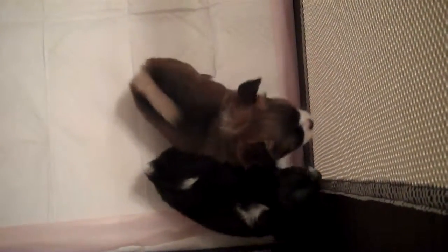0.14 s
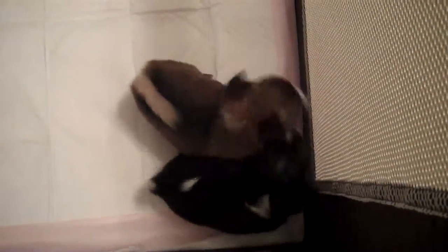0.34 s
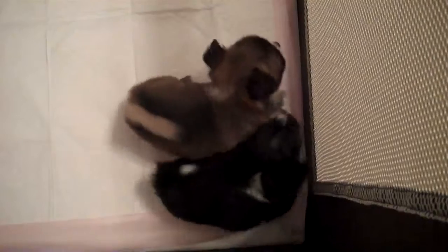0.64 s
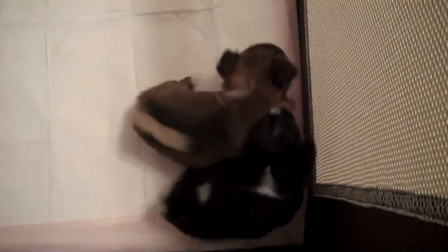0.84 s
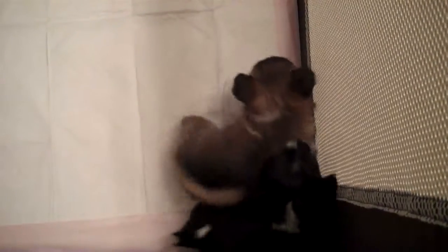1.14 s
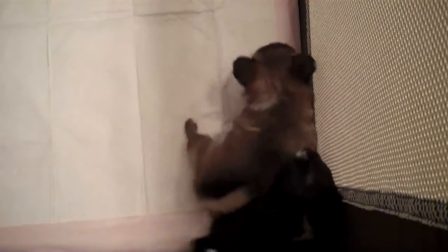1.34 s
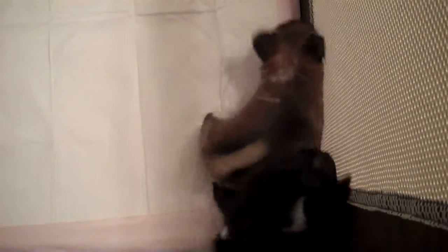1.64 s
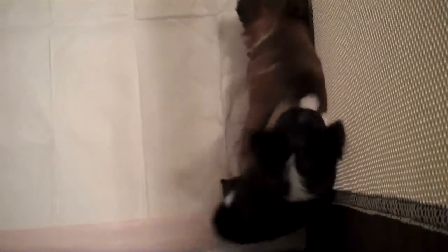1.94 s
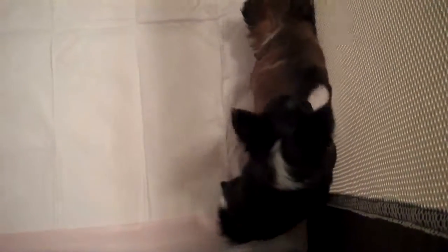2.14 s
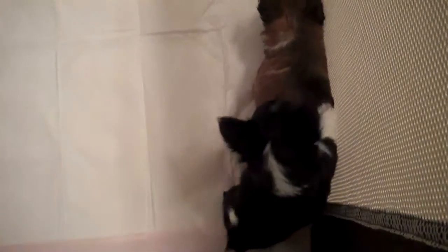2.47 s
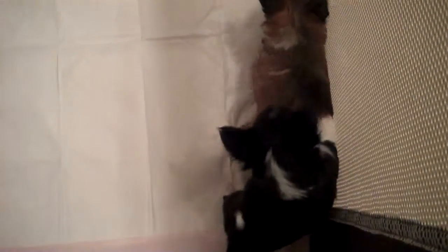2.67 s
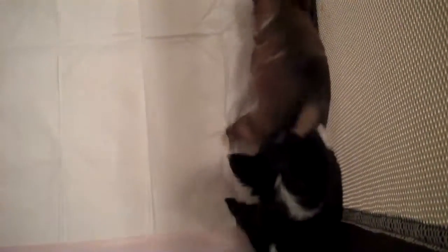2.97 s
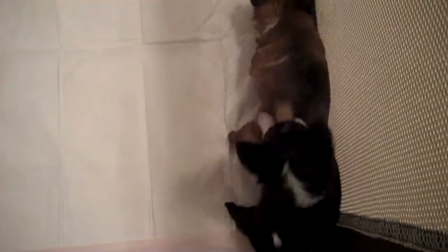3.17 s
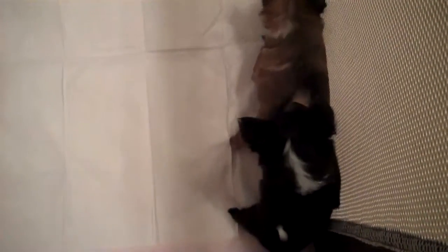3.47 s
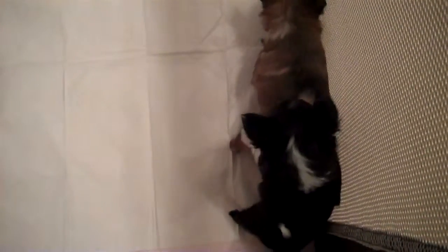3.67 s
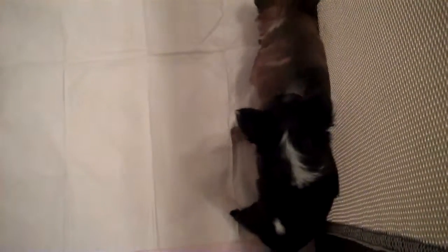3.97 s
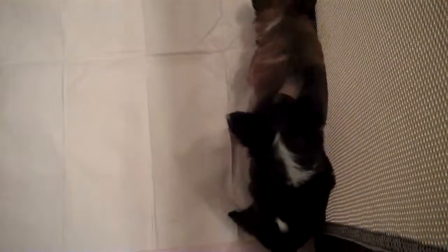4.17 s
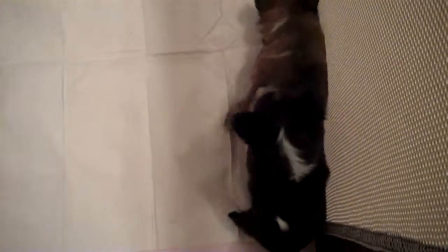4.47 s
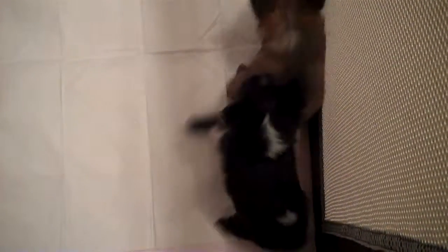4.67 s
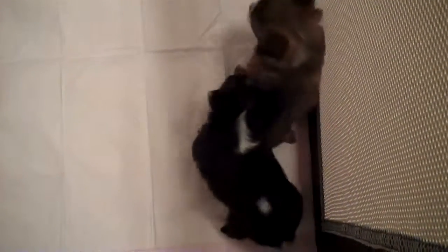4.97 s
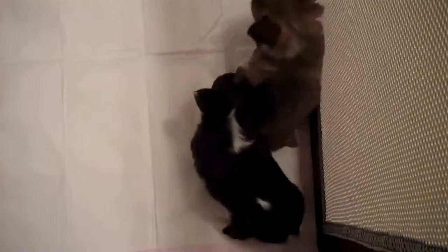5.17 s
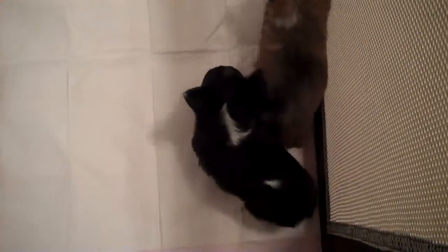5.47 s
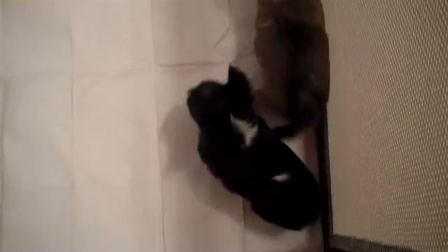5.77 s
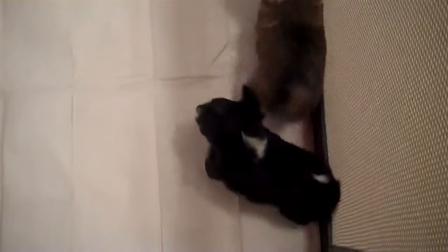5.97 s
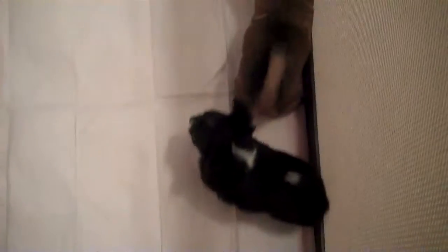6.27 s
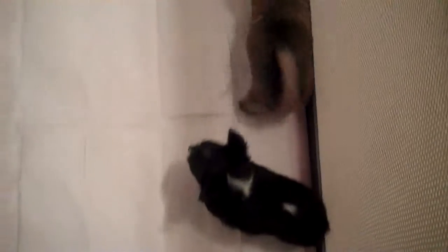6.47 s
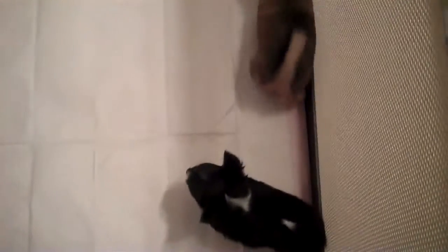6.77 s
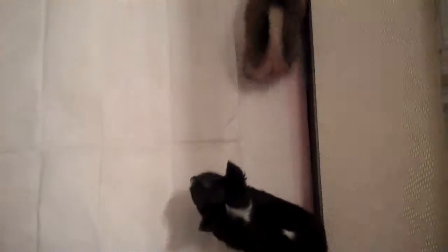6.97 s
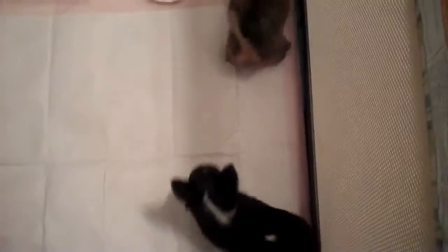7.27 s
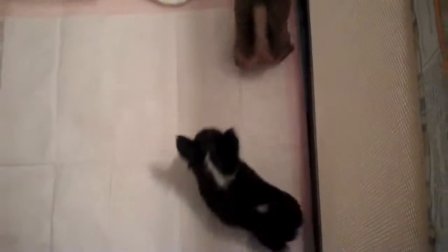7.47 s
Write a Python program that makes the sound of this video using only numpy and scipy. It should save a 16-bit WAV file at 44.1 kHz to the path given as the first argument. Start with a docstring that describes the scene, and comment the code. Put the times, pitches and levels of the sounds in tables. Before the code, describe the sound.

Scratchy paw scuffs, claw ticks and dull tray knocks as wrestling puppies yip hoarsely, then whine in thin, airy, arching squeaks.

```python
"""Two puppies wrestling in a pen

Paws scuff a thin pad as grains of noise, claws tick as filtered snaps, and paws knock a tray that rings.
The puppies give short rough yips, vocal-fold pulses and breath through throat and mouth resonances,
and a row of breathy squeaks, two gliding bands of noise over a wide hiss. Air noise and a low hum
surround them; a small two-port microphone with a treble resonance listens from above."""
import sys
import numpy as np
from scipy import signal
from scipy.fft import rfft, irfft, next_fast_len
from scipy.io import wavfile
from scipy.ndimage import map_coordinates

SR = 44100
rng = np.random.default_rng(int(sys.argv[2]) if len(sys.argv) > 2 else 0)


def pcm_store(signal):
    """Save signal as 16-bit PCM."""
    levels = np.round(np.clip(np.atleast_2d(signal), -1, 1) * 32767)
    wavfile.write(sys.argv[1], SR, levels.astype(np.int16).T)


N = 336042


def amp(db):
    """Decibel law: level to amplitude ratio."""
    return 10 ** (np.asarray(db) / 20)


def unit(x):
    """Normalisation to an rms of 1."""
    return x / np.sqrt(np.mean(x ** 2) + 1e-20)


def along(points, hz):
    """Interpolation of (frequency, value) points on a logarithmic frequency axis."""
    f, v = np.transpose(points)
    return np.interp(np.log(hz + 1), np.log(f + 1), v)


def wobble(rate):
    """Band-limited randomness: a smooth curve through rate random knots a second."""
    knots = rng.standard_normal(int(N * rate / SR) + 4)
    return map_coordinates(knots, [np.arange(N) * rate / SR])


def filtered(x, response):
    """Linear filtering: the spectrum of x times a complex response of frequency."""
    m = next_fast_len(x.shape[-1] + 4096)
    spectrum = rfft(x, m) * response(np.fft.rfftfreq(m, 1 / SR))
    return irfft(spectrum, m)[..., :x.shape[-1]]


def mode(f, hz, width_hz):
    """Damped resonance: a causal second-order response of gain 1 at its peak."""
    return 1j * f * width_hz / (hz * hz - f * f + 1j * f * width_hz)


def swell(t, rise, fall, attack, shape):
    """Growth and decay: gain 1 at t = 0, 6 dB down at -rise and fall; larger powers steepen the edges."""
    return .5 ** np.where(t < 0, np.abs(t / rise) ** attack, np.abs(t / fall) ** shape)


def sides(pan_db):
    """Level panning: left and right gains for a left-minus-right level."""
    return amp(np.array([[.5], [-.5]]) * pan_db)


def rush(pair, spectrum, alike):
    """Partial coherence: two unrelated signals coloured and mixed to a stereo pair of rms 1."""
    def mix(hz):
        turn = np.arccos(np.clip(along(alike, hz), -1, 1)) / 2
        return amp(along(spectrum, hz)) * [np.cos(turn), np.sin(turn)]

    mid, side = filtered(pair, mix)
    return unit(np.array([mid + side, mid - side]))


# spectrum of room and circuit noise: (frequency [Hz], relative density [dB])
AIR_SPECTRUM = [(20, -9), (60, -6), (150, -6), (300, -1.5), (600, -3), (1000, -4), (1600, -7.5),
                (3000, -10.5), (5500, -13.5), (9000, -15.5), (14500, -15)]
# likeness of left and right in that noise: (frequency [Hz], correlation [0-1])
AIR_LIKENESS = [(20, .05), (40, .1), (70, 0.29), (130, 0.45), (500, 0.48), (1400, 0.17), (3000, 0.026),
                (14000, 0.046)]


def room_tone():
    """Broadband noise and narrow-band hum: steady air, and an unsteady hum near twice the mains frequency."""
    air_level = amp(-59.5 + 0.11 * wobble(2.72))
    air = air_level * sides(2.9) * rush(rng.standard_normal((2, N)), AIR_SPECTRUM, AIR_LIKENESS)
    hum = filtered(rng.standard_normal(N), lambda f: mode(f, 117.2, 25.0) ** 2)
    return air + amp(-77.0) * unit(hum)


# reverberation of the pen: (frequency [Hz], time to fall 60 dB [s])
PEN_DECAY = [(300, 0.075), (1500, 0.16), (3500, 0.23), (10000, 0.067)]


def pen(x):
    """Reverberation: the walls answer with decaying noise, each frequency dying at its own speed."""
    hz, t, z = signal.stft(rng.standard_normal((2, SR // 3)), SR, nperseg=256)
    decay = amp(-60 * t / along(PEN_DECAY, hz)[:, None])
    tail = signal.istft(z * decay, SR, nperseg=256)[1]
    delayed = np.pad(x, ((0, 0), (220, 0)))  # the answer begins about 5 ms late
    return signal.fftconvolve(delayed, tail / np.linalg.norm(tail[0]), axes=1)[:, :N]


# scuffs of paws and fur on the pad, folds and thud against the scuff level:
# (peak time [s], level [dB], length [s], folds [dB], thud [dB])
SCUFFS = [(0.06, -61.5, 0.048, -6.5, -6), (0.439, -34, 0.042, -8, -22), (0.501, -45.5, 0.025, -7, -8.5),
          (0.527, -45.5, 0.018, -10.5, -17), (0.683, -51.5, 0.11, -9, -30), (0.97, -54.5, .07, -8, -17),
          (1.044, -39, 0.052, -12.5, -18.5), (1.123, -50.5, 0.094, -10.5, -9), (1.218, -51, 0.11, -11, -8),
          (1.261, -41.5, 0.023, -13.5, -19), (1.33, -52.5, 0.045, -9, -1.5), (1.407, -51, 0.046, -14, -11),
          (1.535, -48.5, 0.061, -10, -14), (1.65, -46.5, 0.049, -13, -10.5),
          (1.803, -53.5, 0.082, -5.5, -3.5), (2.043, -52.5, 0.11, -11, -11),
          (2.262, -50, 0.061, -12, -10.5), (2.636, -68, 0.092, -16, -15), (2.869, -43, 0.028, -15.5, -19),
          (2.942, -42.5, 0.043, -8, -12), (3.024, -52, 0.081, -12, -8), (3.258, -50, 0.038, -10, -1.5),
          (4.782, -40.5, 0.038, -10.5, -12.5), (4.831, -46, 0.063, -12, -10),
          (4.882, -50.5, 0.059, -8, -11), (5.043, -57, 0.022, -11, -20), (5.107, -62, 0.017, -13, -23),
          (5.521, -57.5, 0.095, -11, -6), (5.734, -53, .03, -25, -22), (5.882, -49.5, 0.033, -17, -9.5),
          (5.949, -55, 0.031, -12, -10), (6.008, -52.5, 0.037, -7, -9), (6.069, -48, 0.042, -5, -8.5),
          (6.088, -50, 0.024, -3.5, -6.5), (6.202, -55.5, 0.069, -10, -10), (6.448, -51.5, 0.025, -20, -8),
          (6.587, -54, 0.028, -8.5, -15), (6.726, -56, 0.014, -12, -18), (6.89, -61.5, .035, -1, -7),
          (6.943, -57.5, 0.027, -9.5, -7), (7.034, -56.5, 0.02, -8, -5), (7.203, -49.5, 0.021, -12, -15),
          (7.25, -58.5, .066, -9, -5), (7.317, -48.5, 0.052, -5, -10), (7.398, -54.5, 0.091, -11, -16),
          (7.538, -52, 0.067, -10.5, -6.5)]
# light scratching between the scuffs: (time [s], level [dB])
STIR = [(0.0, -76), (0.38, -85), (0.6, -61), (1.0, -69), (1.6, -58.5), (2.2, -65.5), (2.55, -64.5),
        (3.2, -64.5), (3.61, -73.5), (4.08, -61), (4.79, -63), (5.24, -69.5), (6.07, -66), (6.3, -71),
        (6.92, -69), (7.21, -66.5), (7.62, -65.5)]
# spectra of the pad surface, the pad folds and the floor under the pad:
# (frequency [Hz], relative density [dB])
SURFACE_SPECTRUM = [(2500, -33.5), (4200, -4), (5500, -1.5), (7500, 3.5), (10000, -8), (14500, -31)]
FOLDS_SPECTRUM = [(900, -33), (1600, -0.5), (2500, -2), (3200, 1.5), (4200, -5), (6000, -19)]
THUD_SPECTRUM = [(150, -14), (330, -13.5), (550, 1.5), (880, 2.5), (1300, -2.5), (2200, -31)]
# likeness of left and right for noise in the pen, squeaks included: (frequency [Hz], correlation [0-1])
NEAR_LIKENESS = [(300, 0.95), (1600, 0.98), (3500, 0.64), (6000, 0.06), (8000, 0.22), (11000, 0.1),
                 (14500, 0.046)]
RISE_SHARE = 0.42  # part of a scuff's length before its peak
SURFACE_DB, SURFACE_PAN_DB, FOLDS_PAN_DB = -4, 1.5, 2.3  # surface against scuff level; left minus right
STIR_FOLDS_DB, STIR_THUD_DB, STIR_SWELL_DB = -9, -7, 1.5


def scuffle():
    """Stick-slip friction: fibres catch and let go, noise in grains heard in three ranges of the pad."""
    t = np.arange(N) / SR
    stir = amp(np.interp(t, *np.transpose(STIR)) + STIR_SWELL_DB * wobble(8.6)) ** 2
    # powers add, since the scuffs are unrelated
    surface = stir.copy()
    folds = stir * amp(STIR_FOLDS_DB) ** 2
    thud = stir * amp(STIR_THUD_DB) ** 2
    for s, db, length, folds_db, thud_db in SCUFFS:
        near = slice(max(0, round((s - 3 * length) * SR)), round((s + 4 * length) * SR))
        rise, fall = RISE_SHARE * length, (1 - RISE_SHARE) * length
        power = (amp(db) * swell(t[near] - s, rise, fall, attack=2.2, shape=1.74)) ** 2
        surface[near] += power * amp(SURFACE_DB) ** 2
        folds[near] += power * amp(folds_db) ** 2
        thud[near] += power * amp(thud_db) ** 2
    grain_db = 3.6 * np.clip(wobble(1300), -3, 2.4) + 1.1 * wobble(130)
    grains = amp(grain_db) * rng.standard_normal((2, N))
    return (sides(SURFACE_PAN_DB) * np.sqrt(surface) * rush(grains, SURFACE_SPECTRUM, NEAR_LIKENESS)
            + sides(FOLDS_PAN_DB) * np.sqrt(folds) * rush(grains, FOLDS_SPECTRUM, NEAR_LIKENESS)
            + np.sqrt(thud) * rush(grains, THUD_SPECTRUM, NEAR_LIKENESS))


# paws knock the tray under the pad: (time [s], level [dB], left minus right [dB])
KNOCKS = [(0.342, -38.5, -11), (1.278, -44, 0), (1.343, -42, 0), (1.836, -36.5, 0), (2.205, -34, 1),
          (3.266, -39.5, -12), (4.582, -37.5, -11), (4.614, -39.5, -0.5), (4.754, -41, 0.0),
          (4.817, -40, -1.0), (6.213, -44.5, -1)]
# modes of the tray, varied at every knock: (frequency [Hz], level [dB], time to fall 60 dB [s])
TRAY_MODES = [(513, -8, 0.023), (650, -7, 0.03), (878, -0.5, 0.04), (1174, -10, 0.022)]


def knocks():
    """Modal vibration: the tray rings briefly, its modes at new strengths and pitches for every paw."""
    out, t = np.zeros((2, N + SR)), np.arange(SR // 10) / SR
    onset = 1 - np.exp(-t / .0013)
    for s, db, pan_db in KNOCKS:
        ring = 0
        for hz, level_db, t60 in TRAY_MODES:
            decay = amp(level_db + rng.normal(0, 3) - 60 * t / t60)
            ring = ring + decay * np.sin(2 * np.pi * hz * rng.normal(1, .04) * t)
        out[:, round(s * SR):][:, :len(t)] += amp(db) * sides(pan_db) * ring * onset
    return out[:, :N]


# the clearest claw ticks: (time [s], snap before filtering [dB], folds against the snap [dB])
TICKS = [(0.4205, -18, -11), (0.4487, -10, -4), (0.4613, -12, -4), (0.4647, -14, -12), (0.4799, -12, -16),
         (0.4975, -3.5, -8), (0.5004, -19, -11), (0.5299, -22, -13), (0.6481, -23, -15), (0.9711, -26, 0),
         (1.0118, -24, -7), (1.0264, -8.5, -9), (1.0681, -22, -11), (1.0876, -20, -19), (1.1053, -20, -15),
         (1.1156, -20, -14), (1.2689, -19, -19), (1.3316, -26, -15), (0.9913, -28, -14), (5.7473, -30, -17),
         (1.5245, -22, -10), (1.546, -23, -14), (1.6353, -22, -14), (1.6441, -24, -17), (1.6662, -18, -22),
         (1.8383, -24, -7), (2.0357, -25, -7), (2.2047, -23, -4), (2.8298, -27, -15), (2.8698, -19, -19),
         (2.8753, -17, -15), (3.2359, -7, 1), (3.3946, -29, -16), (4.3229, -27, -6), (4.6713, -27, 1),
         (4.7561, -24, -3), (4.8204, -21, -12), (5.0421, -29, -14), (5.7305, -25, -18), (5.8721, -23, -14),
         (5.88, -22, -12), (5.8921, -26, -11), (5.9505, -28, -15), (6.0837, -22, -6), (6.0901, -23, -7),
         (6.4526, -25, -14), (6.5837, -23, -11), (6.7289, -26, -14), (7.0271, -26, -18), (7.2035, -20, -19),
         (7.3055, -25, -6), (7.4123, -25, -13), (7.4261, -25, -14), (7.448, -27, -16)]
# faint ticks shed at random moments around the scuffs; two chances for each scuff
FAINT_TICK_DB, FAINT_FOLDS_DB, FAINT_SPREAD_S, FAINT_CHANCE = -31, -13, .04, .3
TICK_PAN_DB, TICK_PAN_SCATTER_DB = 4, 2.5  # surface part, left minus right


def claws():
    """Impulse excitation: a snap and faint rattle, bright on the surface and duller in the folds."""
    bright, dull, t = np.zeros((2, N + 64)), np.zeros((2, N + 64)), np.arange(64) / SR
    faint = []
    for row in SCUFFS + SCUFFS:
        if rng.uniform() < FAINT_CHANCE:
            moment = abs(row[0] + FAINT_SPREAD_S * rng.normal())
            faint.append((moment, FAINT_TICK_DB + rng.normal(0, 1.5), FAINT_FOLDS_DB + rng.normal(0, 3)))
    for s, db, folds_db in TICKS + faint:
        rattle = .17 * amp(-60 * t / .0025) * rng.standard_normal((2, len(t)))
        snap = (t == 0) + rattle
        at = np.clip(round(s * SR) - 4, 0, N)  # a little early, as the filters respond late
        pan = sides(rng.normal(TICK_PAN_DB, TICK_PAN_SCATTER_DB))
        bright[:, at:at + len(t)] += amp(db) * pan * snap
        dull[:, at:at + len(t)] += amp(db + folds_db) * snap
    surface = filtered(bright, lambda f: mode(f, 6800, 4800) ** 2 * mode(f, 6500, 5000))
    folds = filtered(dull, lambda f: mode(f, 2900, 3500) ** 2)
    return (surface + folds)[:, :N]


# yips, breath share clipped to 0-1: (peak time [s], level [dB], rise [s], fall [s], pitch [Hz],
# roughness [breath share], throat [Hz], mouth [Hz], mouth opening [dB], hiss [dB])
YIPS = [ (1.124, -19, 0.0028, 0.0058, 340, 0.7, 1570, 3000, -35, -40),
        (1.136, -18, 0.0077, 0.0077, 338, 0.2, 1630, 2980, -35, -40),
        (1.768, -16.5, .0075, 0.0048, 287.3, 0.65, 1560, 3170, 4.5, -13),
        (1.999, -19, 0.0072, 0.0095, 333.3, 0.6, 1580, 3170, 1.5, -13),
        (2.206, -26.5, 0.0076, 0.0049, 296.6, 0.05, 2150, 3300, -9.5, -14.5),
        (2.935, -26.5, 0.016, 0.0026, 300, 1.2, 1720, 3200, 0.5, -3.5),
        (2.990, -26, 0.014, 0.012, 299, 0.98, 1310, 4130, 5.5, -3.5),
        (3.237, -27, 0.012, 0.0097, 352.4, 0.55, 1200, 3880, 8, -3.5), ]
CHEST_DB, HUM_DB = -11.5, -12  # against the throat; the hum weakens as the mouth opens
RASP_DB = -8.5  # against the mouth opening


def yips():
    """Source-filter voice: uneven vocal-fold pulses and gated breath ring throat and mouth."""
    out, t = np.zeros((2, N)), np.arange(-SR // 20, SR // 10) / SR
    for s, db, rise, fall, pitch_hz, rough, throat_hz, mouth_hz, mouth_db, hiss_db in YIPS:
        rasp_db = mouth_db + RASP_DB
        cycle = (t * pitch_hz + .12 * np.sin(t * 700 + rng.uniform(0, 2 * np.pi))) % 1
        starts = np.diff(cycle, prepend=0) < -.5
        pulses = unit(starts * amp(rng.normal(0, 4.7, len(t))))
        breath = unit(np.exp(-1.2 * cycle) * rng.standard_normal(len(t)))
        # the mouth opens suddenly, then effort grows to the peak and dies away
        growth = (t > -rise) * (1 + 0.93 * t / rise)
        effort = np.where(t < 0, growth, .5 ** (np.abs(t / fall) ** 1.83))
        share = np.clip(rough, 0, 1)
        folds = effort * (np.sqrt(1 - share) * pulses + np.sqrt(share) * breath)

        def tract(f):
            throat = mode(f, throat_hz, 484) ** 2
            mouth = amp(mouth_db) * mode(f, mouth_hz, 870) ** 2
            chest = amp(CHEST_DB) * mode(f, 645, 980) ** 2
            hum = amp(HUM_DB) / (1 + 5 * amp(mouth_db)) * mode(f, 445, 210) ** 2
            return throat + mouth - chest - hum

        def airway(f):
            rasp = amp(rasp_db) * mode(f, 2560, 2000) ** 2
            hiss = amp(hiss_db) * mode(f, 7900, 4600) ** 2 * mode(f, 5600, 4300)
            return rasp - hiss

        voice = filtered(folds, tract) - filtered(effort * breath, airway)
        out[:, round(s * SR) - SR // 20:][:, :len(t)] += amp(db) * voice
    return out


# squeaks: (start [s], time of highest pitch [s], end [s], attack [s], lower top [Hz], upper top [Hz],
# bend of the climb [power], lower whistle [dB], its fading [dB per s], upper whistle [dB], breath [dB])
SQUEAKS = [ (3.882, 3.958, 4.06, .012, 3300, 4170, 2.3, -37, 102, -38, -38.5),
           (4.078, 4.186, 4.26, .045, 3170, 3720, 1.4, -43.5, 17, -42, -43.5),
           (4.298, 4.378, 4.435, .025, 3080, 3880, 1.6, -42, 40, -64, -49),
           (4.482, 4.548, 4.595, .022, 2980, 3780, 1.5, -42, 60, -54, -56),
           (4.667, 4.702, 4.722, .008, 3450, 3950, 1.8, -43, 213, -53.5, -56), ]
# spectrum of the wide hiss: (frequency [Hz], relative density [dB])
BREATH_SPECTRUM = [(600, -30), (1300, -17), (2500, -19), (3500, -3.5), (4800, -5.5), (6000, -1),
                   (7300, 1.5), (8700, -7.5), (9600, -7), (11000, -18), (14500, -26)]
START_HZ, END_HZ = 2050, 2250  # pitch of the lower whistle at both ends, before its waver
RELEASE_S = 0.029
UPPER_LEAD_S, UPPER_RISE_S, UPPER_FALL_S = 0.015, 0.013, 0.03  # it speaks near the highest pitch
YIELD_DB, YIELD_LAG_S, YIELD_S = 4, .012, .025  # the lower whistle gives way by at most YIELD_DB
BREATH_LEAD_S, BREATH_RISE, BREATH_FALL = 0.0058, 0.55, 0.53  # rise, fall: shares of climb and descent


def squeaks():
    """Turbulent whistling: breath through a narrowing throat, two hoarse glides over a wide hiss."""
    t = np.arange(N) / SR
    low_hz, high_hz, low_gain, high_gain, breath_gain = np.zeros((5, N))
    for start, top, end, attack, top_hz, upper_hz, bend, low_db, fade_db, high_db, breath_db in SQUEAKS:
        on = (t > start) & (t < end)
        u = t[on]
        # the pitch arches: a bending climb from the start, a parabola down to the end
        climb = None
        low_hz[on] = top_hz - np.where(u < top,
                                       (top_hz - START_HZ) * (np.maximum(top - u, 0) / (top - start)) ** bend,
                                       (top_hz - END_HZ) * ((u - top) / (end - top)) ** 2)
        high_hz[on] = low_hz[on] + upper_hz - top_hz
        gate = np.clip((u - start) / attack, 0, 1) ** 1.14 * np.clip((end - u) / RELEASE_S, 0, 1)
        yielding = swell(u - top - YIELD_LAG_S, YIELD_S, YIELD_S, attack=2, shape=2)
        taken = min(1, amp(high_db - low_db)) * yielding
        low_gain[on] = gate * amp(low_db - fade_db * (u - start) - YIELD_DB * taken)
        speaking = swell(u - top + UPPER_LEAD_S, UPPER_RISE_S, UPPER_FALL_S, attack=2.4, shape=1.6)
        high_gain[on] = gate * amp(high_db) * speaking
        rise, fall = BREATH_RISE * (top - start), BREATH_FALL * (end - top)
        breath_gain[on] = amp(breath_db) * swell(u - top + BREATH_LEAD_S, rise, fall, attack=3.0, shape=3.0)
    # weak breath whistles less clearly
    focus = np.clip(np.log10(low_gain / amp(-66) + 1e-9) * 20 / 24, .1, 1)

    def band(hz, width_hz, steady):
        """Frequency shifting: noise near 0 Hz plus a steady part, moved up to the gliding centre."""
        turning = np.exp(2j * np.pi * np.cumsum(hz) / SR)
        return unit(np.real(turning * (steady + wobble(width_hz) + 1j * wobble(width_hz))))

    waver = 1 + .017 * wobble(70)  # the throat never holds still
    # each whistle has a narrow core and a wide skirt
    low = focus * band(low_hz * waver, 320, .9) + amp(-8) * band(1.03 * low_hz, 1900, 0)
    high = band(high_hz * waver, 300, .8) + amp(-7) * band(.95 * high_hz, 1300, 0)
    breath = rush(rng.standard_normal((2, N)), BREATH_SPECTRUM, NEAR_LIKENESS)
    return low_gain * low + high_gain * high + breath_gain * breath


def scene():
    """Superposition: near sounds with a delay between the ports, the pen's answer and the room."""
    voices, paws = yips() + squeaks(), claws() + knocks()
    near = voices + paws + scuffle()

    def lag(f):
        # the right port is 35 microseconds nearer; in the treble the housing evens out the paths
        return np.exp(-2j * np.pi * np.minimum(f, 4500) * np.array([[.5], [-.5]]) * 3.5e-5)

    return filtered(near, lag) + amp(-13.5) * pen(voices + paws) + room_tone()


# microphone resonance, left port then right: (frequency [Hz], width [Hz], peak gain [dB])
PORTS = [(7970, 560, 7.5), (7540, 600, 1)]
TOP_HZ = 14250  # band limit


def record(dry):
    """Port resonance: each port lifts the treble at its own frequency; nothing passes the band limit."""
    def ports(f):
        return np.array([1 + (amp(db) - 1) * mode(f, hz, width_hz) for hz, width_hz, db in PORTS])

    return filtered(dry, lambda f: ports(f) * (f < TOP_HZ))


dry = scene()
out = record(dry)
pcm_store(out)
```